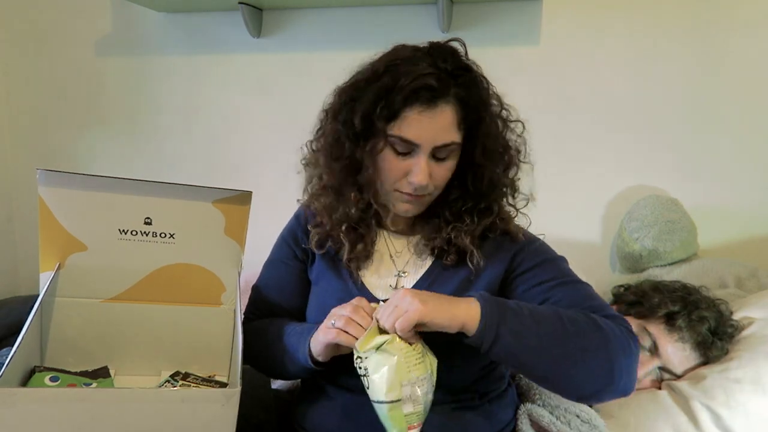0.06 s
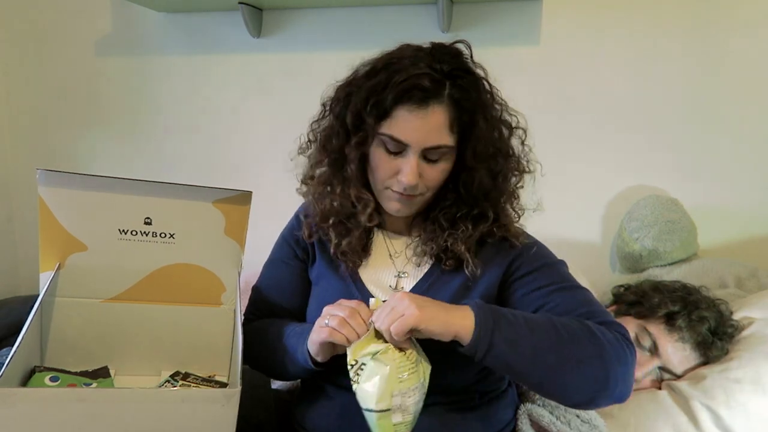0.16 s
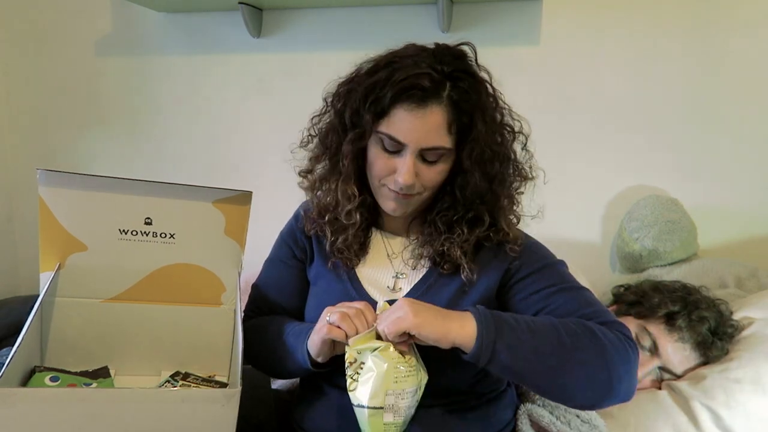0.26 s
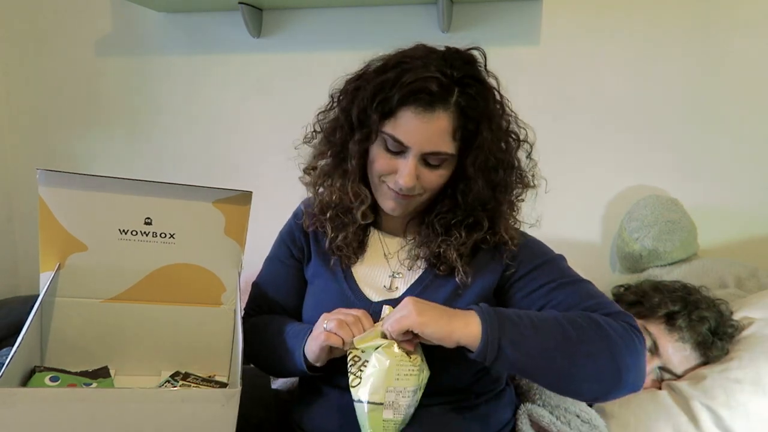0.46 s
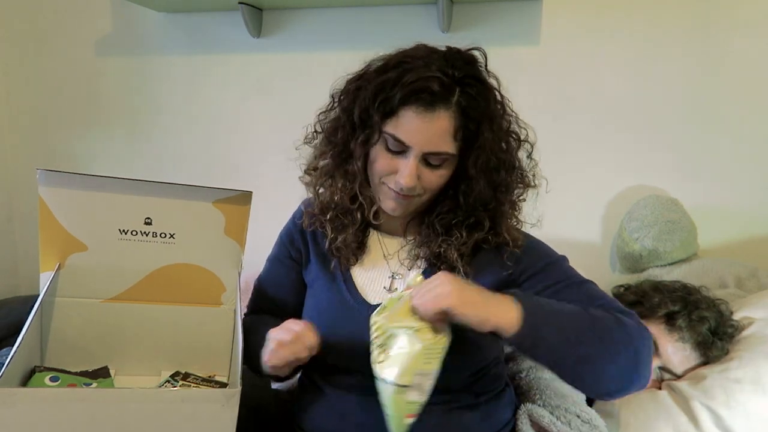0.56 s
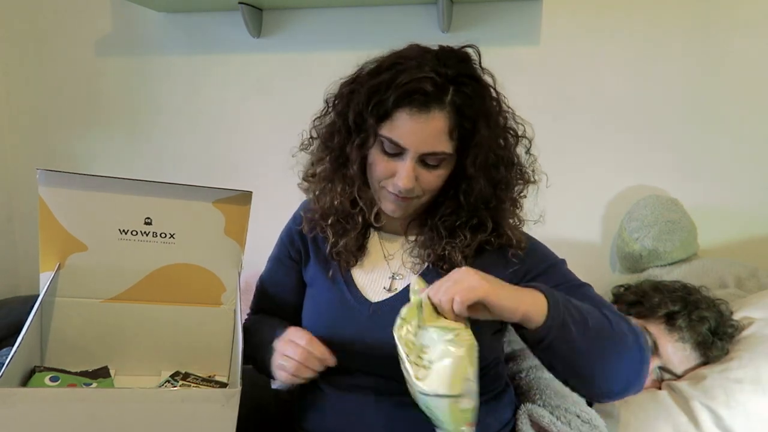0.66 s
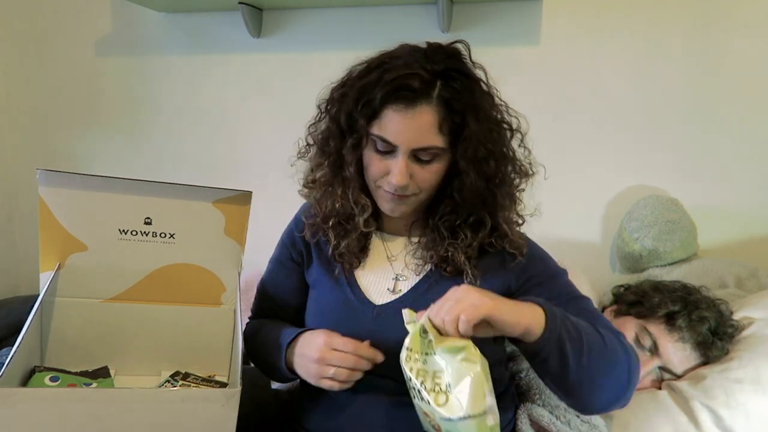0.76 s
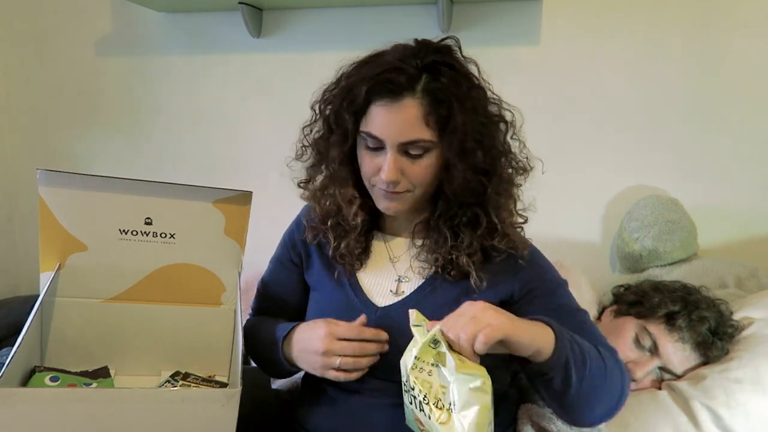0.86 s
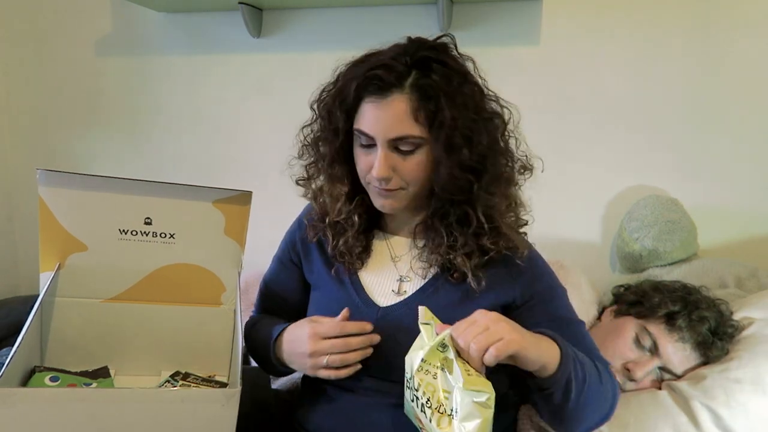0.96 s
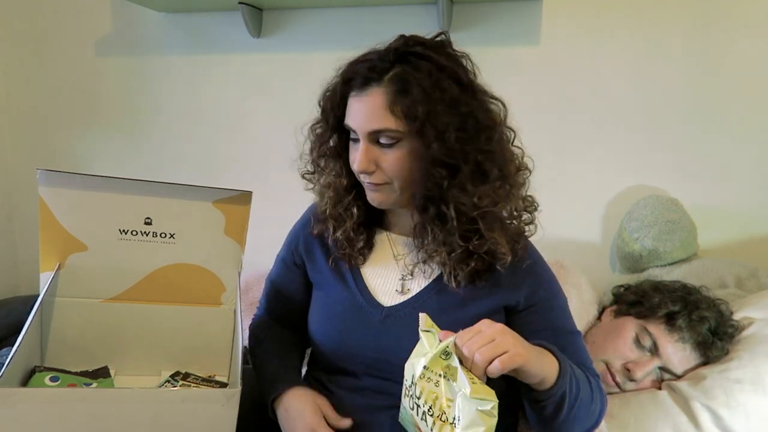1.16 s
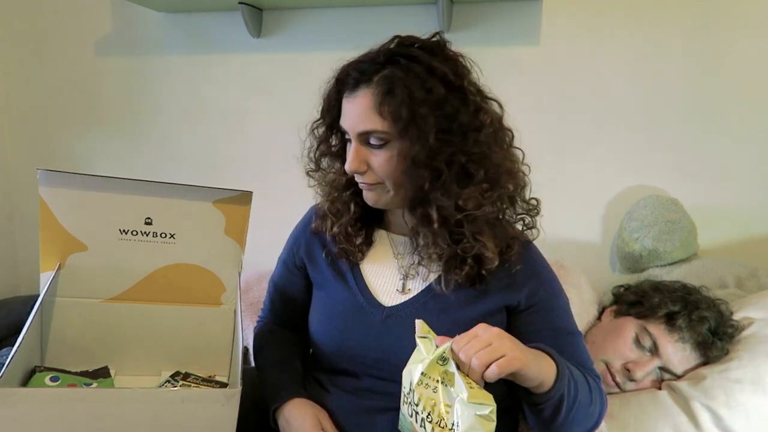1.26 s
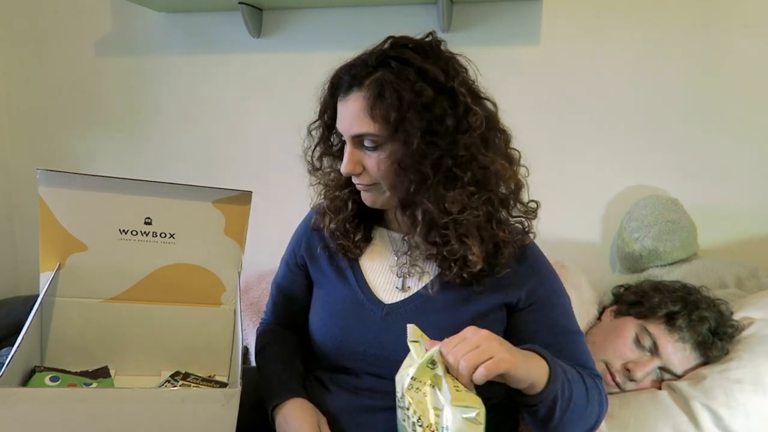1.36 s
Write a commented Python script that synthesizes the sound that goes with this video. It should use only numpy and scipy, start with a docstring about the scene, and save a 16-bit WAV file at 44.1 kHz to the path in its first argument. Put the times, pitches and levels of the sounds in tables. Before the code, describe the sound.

Crisp plastic packet crackling, snapping and briefly tearing in someone's hands in a small room.

```python
"""Fine crackle, dull flops, sharp clicks and a quickening tear: a thin plastic snack packet is pulled open
and handled in a small furnished room, over a steady room tone.
Creases snap as short rings on three modes with a bright tick on top; crunches are quick clusters of them.
Panels flop as single lower rings, the seam tears in a run of ticks, and the crackle is thousands of tiny rings.
Decaying noise makes the near reflections and the stereo echo; shaped noise makes the room tone."""
import sys
import numpy as np
from scipy import signal
from scipy.fft import rfft, irfft
from scipy.io import wavfile
from scipy.ndimage import uniform_filter1d

SR = 44100
rng = np.random.default_rng(int(sys.argv[2]) if len(sys.argv) > 2 else 0)


def store_pcm(level_fs):
    """Save levels as 16-bit WAV."""
    pcm = np.round(np.clip(level_fs, -1, 1) * 32767).astype(np.int16)
    wavfile.write(sys.argv[1], SR, np.atleast_2d(pcm).T)


def decibels_to_gain(level_db):
    """Convert a level in decibels to a linear amplitude gain (20 dB per decade)."""
    exponent = np.asarray(level_db, float) / 20
    return 10 ** exponent


N = 61739   # length [samples]


def rms_one(x):
    """Scale a signal to an rms of 1."""
    return x / np.sqrt(np.mean(x ** 2) + 1e-20)


def at_hz(points, hz):
    """Read a (frequency, value) curve on a logarithmic frequency axis."""
    f, v = np.transpose(points)
    return np.interp(np.log(np.maximum(hz, 1)), np.log(f), v)


def coloured_noise(spectrum):
    """Steady noise of a given spectrum; rms 1."""
    hz = np.fft.rfftfreq(N, 1 / SR)
    white = rfft(rng.standard_normal(N))
    return rms_one(irfft(white * decibels_to_gain(at_hz(spectrum, hz)), N))


def room_tone():
    """The room's hum: steady shaped noise, separate for the centre and the side."""
    # spectra of the room tone: (frequency [Hz], relative level per Hz [dB])
    hum_mid = [(15,-17), (45,0.5), (110,-6.5), (300,-3), (500,-7.5), (1200,-10), (2500,-15), (5300,-22),
               (6200,-29), (11000,-37.5), (16000,-50)]
    hum_side = [(15,-41), (50,-17), (200,-0.5), (400,-1), (700,-8), (2000,-18.5), (6500,-29), (12000,-40),
                (16000,-44)]
    mid_db, side_db = -54.5, -52.5   # rms
    return decibels_to_gain(mid_db) * coloured_noise(hum_mid), decibels_to_gain(side_db) * coloured_noise(hum_side)


def ring(clicks, hz, t60):
    """A two-pole resonator: a unit click sets a decaying sine ringing."""
    radius = decibels_to_gain(-60 / (t60 * SR))
    w = 2 * np.pi * hz / SR
    return signal.lfilter([0, np.sin(w)], [1, -2 * radius * np.cos(w), radius ** 2], clicks + 1e-18)


def crackle():
    """Tiny creases come at random, louder and softer in clumps, each ringing briefly at a pitch of its own."""
    # loudness over time: (time [s], middle level [dB], bass level [dB], treble level [dB])
    crackle_levels = [(0,-28.5,-27,-48.5), (0.022,-41,-38.5,-50), (0.088,-41,-40,-54.5),
                      (0.118,-29.5,-28.5,-50.5), (.16,-29.5,-31,-41), (.2,-27,-27,-41),
                      (0.248,-23,-32.5,-45), (.295,-32,-29,-35.5), (.325,-31.5,-30.5,-50),
                      (.37,-30,-32,-41.5), (.43,-41,-35,-51), (0.481,-35.5,-32,-41.5),
                      (0.518,-31.5,-27.5,-32.5), (0.549,-37.5,-49,-37.5), (0.611,-33.5,-35.5,-45),
                      (0.627,-25,-36,-59), (0.658,-25.5,-29.5,-41), (.7,-30.5,-44,-46),
                      (0.734,-27.5,-32.5,-34), (.76,-31,-40,-52), (.8,-32,-42.5,-43), (0.851,-37.5,-34,-58),
                      (.875,-45,-45,-65), (0.891,-74,-42,-84)]
    # upper middle against the lower middle: (time [s], level [dB])
    crispness = [(0,-6.5), (.12,-4.5), (.2,-0.5), (.3,-2.5), (.43,-0.5), (.52,9), (.6,-2), (.66,-13),
                 (.74,-13), (.85,-6.5)]
    # balance of the pitches within each group: (frequency [Hz], relative level per Hz [dB])
    grain_colour = [(100,-12), (200,-21.5), (430,-6.5), (800,-8.5), (1200,-3.5), (2000,5.5), (3000,-1.5),
                    (3900,5.5), (5000,-17.5), (6500,-15), (9500,-30), (12500,-20), (15000,-71)]
    grains_per_s, grain_cycles = 12000, 6.0   # cycles to fall 60 dB in each resonator
    spread_db, clump_db = 2.5, 1.2            # mean random boost; rms swing of the clumps

    swell = uniform_filter1d(rng.standard_normal(N), size=300)
    clumps = rms_one(uniform_filter1d(swell, size=300))
    boost = np.minimum(rng.exponential(1, N), 5)
    sizes = decibels_to_gain(spread_db * boost + clump_db * clumps) * rng.choice([-1, 1], N)
    grains = sizes * (rng.random(N) < grains_per_s / SR)

    # deal the grains out to 30 pitches, more of them to the high ones
    pitches = np.geomspace(150, 15000, 30)
    chance = np.sqrt(pitches)
    dealt = rng.choice(30, N, p=chance / chance.sum())
    groups = np.zeros((4, N))   # lower middle, bass, treble, upper middle
    for k, hz in enumerate(pitches):
        t60 = grain_cycles / hz
        # two resonators in a row, so each grain swells before it dies
        grain_rings = ring(ring(grains * (dealt == k), hz, t60), hz, t60)
        if hz < 1300:
            group = 1
        elif hz > 5000:
            group = 2
        elif hz > 2700:
            group = 3
        else:
            group = 0
        # the bands widen with pitch, hence the root
        groups[group] += rms_one(grain_rings) * decibels_to_gain(at_hz(grain_colour, hz)) * np.sqrt(hz)

    s, *levels = np.transpose(crackle_levels)
    levels.append(levels[0] + np.interp(s, *np.transpose(crispness)))
    t = np.arange(N) / SR
    out = np.zeros(N)
    for sound, db in zip(groups, levels):
        # every group plays 5 dB under its table, and is silent after the last time
        out += rms_one(sound) * decibels_to_gain(np.interp(t, s, db - 5, right=-120))
    return out


def add(out, s, db, hz, cycles):
    """One short ring that swells over some cycles and dies away."""
    t = np.arange(4096) / SR
    u = t * hz / cycles
    swell = (u * np.exp(1 - u)) ** 2
    i = int(s * SR)
    out[i:i + len(t)] += decibels_to_gain(db) * swell * np.sin(2 * np.pi * hz * t)


def flops():
    """A whole panel flops over with one duller, lower ring."""
    # panels flopping: (time [s], peak level [dB], pitch [Hz], rise [cycles])
    panel_flops = [(0.107,-21.5,1150,1.3), (.1405,-20,825,1.13), (0.1664,-15.5,446,1.17),
                   (0.1853,-14,1063,1.66), (0.1913,-14.5,964,1.4), (.2185,-15,920,0.81),
                   (0.2294,-21,1060,0.82), (0.2408,-12,1093,1.5), (.246,-27.5,263,0.99), (0.316,-41,140,.9),
                   (.5005,-20,750,0.71), (.530,-20.5,585,0.47), (.638,-13,814,0.75),
                   (0.645,-11.5,1010,0.68), (.655,-36.5,176,1.75), (.665,-22.5,855,2.3),
                   (0.887,-32.5,449,0.98), (0.985,-40,296,0.63), (1.114,-45,245,1.66),
                   (1.116,-44.5,970,3.5), (1.189,-49,246,0.7)]
    out = np.zeros(N + SR)
    for s, db, hz, cycles in panel_flops:
        add(out, s, db, hz, cycles)
    return out[:N]


def add_crease(out, s, db, hz, cycles, tick_db):
    """A crease snaps over: rings on a main, a higher and a lower mode, with bright ticks on top."""
    add(out, s, db, hz, cycles)
    add(out, s, db - 8.5, hz * 1.398, cycles)
    add(out, s, db - 10, hz * 0.601, cycles * 0.601)
    tick_hz, tick_cycles = 9930, 2.9
    for ratio in (.63, 1, 1.17):
        add(out, s, db + tick_db, tick_hz * ratio, tick_cycles)


def crunches():
    """Several creases give way at once: a quick cluster of snaps that tends to fall in pitch and level."""
    # crunches: (time [s], length [s], reference level [dB], lowest pitch [Hz], highest pitch [Hz])
    crunch_events = [(0.1083,.004,-13,1970,3380), (0.14,0.0054,-22.5,1600,3070),
                     (0.1852,0.0044,-2,2750,4010), (0.1883,.004,-7,2260,3670), (0.507,0.0028,-11,1760,2700),
                     (0.6352,.005,-0.5,1970,3480), (1.107,0.0089,-34.5,1520,3130)]
    creases_each, rise_cycles, tick_db = 10, 1.33, -24.5
    scatter = .9   # share of the pitch range left to chance
    out = np.zeros(N + SR)
    for s, length, db, low_hz, high_hz in crunch_events:
        for k, (jitter, pitch, size) in enumerate(rng.random((creases_each, 3))):
            part = (k + jitter) / creases_each   # how far through the crunch
            height = np.clip(1 - part + scatter * (pitch - .5), 0, 1)
            hz = low_hz * (high_hz / low_hz) ** height
            crease_db = db - 4.5 - 5 * size - 4 * part
            add_crease(out, s + part * length, crease_db, hz, rise_cycles, tick_db)
    return out[:N]


def snaps():
    """Single creases snap over with short clicks, each at its own pitch."""
    # snaps: (time [s], main-mode peak level [dB], pitch [Hz], rise [cycles], each tick re main mode [dB])
    crease_snaps = [(.1412,-15.5,1890,0.39,-22), (.1654,-9.5,2920,1.67,-30), (.2178,-14,3650,1,-20),
                    (.2292,-10,3150,1.2,-18), (.2462,-15.5,1910,0.41,-17), (.2885,-13,1550,0.52,-17),
                    (.3362,-5.5,2560,1.32,-15.5), (.3430,-19,2440,0.88,-15), (.3921,-15,2300,0.63,-36),
                    (.4277,-14,3000,1.75,-32), (.4522,-20.5,2760,1.1,-28), (.4706,-24.5,1890,2.8,-24),
                    (.5133,-11.5,2700,0.85,-30), (.5965,-18.5,3620,1.8,-34), (.6312,-2.5,2970,1.6,-33),
                    (.6412,-3.5,2130,0.69,-30), (.6508,-14,2470,0.37,-18), (.6900,-12.5,2410,1.5,-35),
                    (.7109,-6.5,2790,1.4,-36), (.7208,-11,2170,1.4,-34), (.7210,-9,3830,1.3,-28),
                    (.7673,-17,2300,1.4,-20), (.7727,-45,2500,0.65,-21), (.7791,-10.5,3250,1.7,-29),
                    (.7792,-10.5,1730,1,-38), (.7893,-24,2460,2.8,-26), (.8168,-19,1920,0.47,-37),
                    (.8866,-9.5,2366,1.55,-37), (.8867,-17,4190,1.3,-30.5), (1.1195,-23.5,2420,1.1,-45),
                    (1.121,-41,3800,2.4,-48)]
    out = np.zeros(N + SR)
    for s, db, hz, cycles, tick_db in crease_snaps:
        add_crease(out, s, db, hz, cycles, tick_db)
    return out[:N]


def tear():
    """The seam tears in a quickening run of ticks, all at one pitch."""
    # ticks of the seam: (time [s], main-mode peak level [dB], each treble tick re main mode [dB])
    seam_ticks = [(.4766, -22, -20), (.4864, -17, -18), (.4923, -16, -18), (.4963, -16, -20),
                  (.5007, -16, -20), (.5042, -17, -20), (.5173, -16, -22), (.5202, -18, -22),
                  (.5233, -17, -22), (.5272, -16, -22)]
    pitch_hz, rise_cycles = 3400, 0.47
    out = np.zeros(N + SR)
    for s, db, tick_db in seam_ticks:
        add_crease(out, s, db, pitch_hz, rise_cycles, tick_db)
    return out[:N]


def near_reflections(x):
    """Near reflections and the film's own rattle: a very short burst of dying noise after each click."""
    level_db, t60_s = -13.5, 0.011
    t = np.arange(1, 1500) / SR
    early = rng.standard_normal(len(t)) * decibels_to_gain(-60 * t / t60_s)
    early = early / np.sqrt(np.sum(early ** 2))
    return decibels_to_gain(level_db) * signal.fftconvolve(x, early)[:N]


def room(x):
    """Echo as noise dying band by band; centre and side pick-up each have their own colour."""
    # time to fall 60 dB: (frequency [Hz], decay [s])
    echo_t60 = [(150, 0.84), (500, 0.55), (1400, 0.3), (3700, 0.43), (10000, 0.27)]
    # echo colour at the centre and at the side: (frequency [Hz], level re direct [dB])
    echo_mid = [(100, -8), (300, -2), (1000, -5.5), (2500, -8), (3400, -7.5), (4600, -3), (6500, -1),
                (9000, -0.5), (16000, -16.5)]
    echo_side = [(100, -26), (300, -14.5), (1000, -22.5), (2500, -37), (4000, -15.5), (6000, -3),
                 (8500, 2.5), (12000, -0.5), (16000, -17)]
    gap_s, rise_s = 0.0011, 0.0048
    t = np.arange(SR // 2) / SR
    onset = np.clip((t - gap_s) / rise_s, 0, 1)
    echo = np.zeros((2, len(t)))
    edges = 100 * 2 ** np.arange(0, 7.6, .5)   # half-octave bands
    for low, high in zip(edges, edges[1:]):
        hz = np.sqrt(low * high)
        band_pass = signal.butter(2, [low, high], "band", fs=SR, output="sos")
        band = signal.sosfilt(band_pass, rng.standard_normal(echo.shape))
        fade = onset * decibels_to_gain(-60 * t / at_hz(echo_t60, hz))
        fade = fade / np.sqrt(np.sum(fade ** 2))
        gains = decibels_to_gain([[at_hz(echo_mid, hz)], [at_hz(echo_side, hz)]])
        echo += band * fade * gains
    return signal.fftconvolve(x[None], echo, axes=1)[:, :N]


def scene():
    """Packet in front of the stereo microphone, its echo and the room tone."""
    packet = crackle() + flops() + crunches() + snaps() + tear()
    low_cut = signal.butter(2, 138, "high", fs=SR, output="sos")   # the microphone's bass limit [Hz]
    packet = signal.sosfilt(low_cut, packet)
    echo_mid, echo_side = room(packet)
    hum_mid, hum_side = room_tone()
    mid = packet + near_reflections(packet) + echo_mid + hum_mid
    side = echo_side + hum_side
    return np.array([mid + side, mid - side])


def band_limit(x):
    """A steep low-pass at the top of the band."""
    return signal.sosfilt(signal.butter(12, 16520, fs=SR, output="sos"), x)


def record(dry):
    """Hand over the finished stereo mix."""
    return band_limit(dry)


dry = scene()
out = record(dry)
store_pcm(out)
```